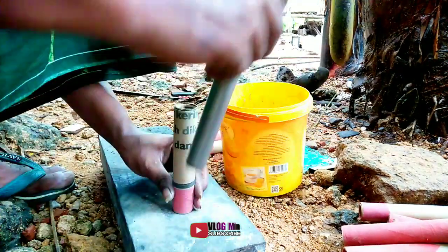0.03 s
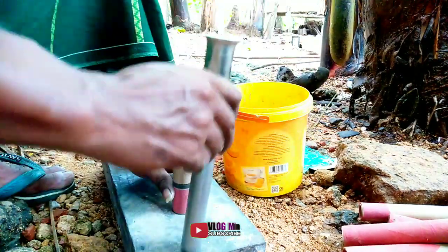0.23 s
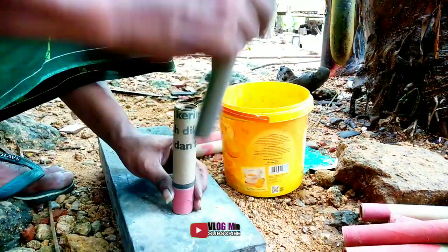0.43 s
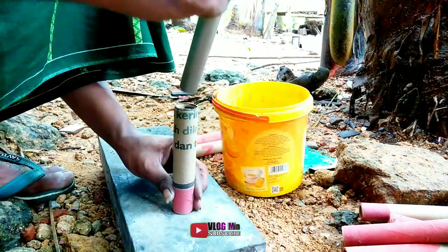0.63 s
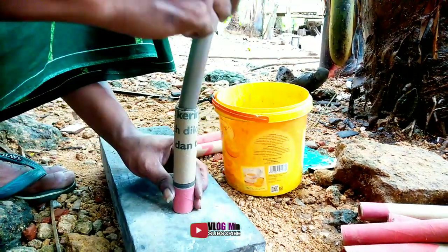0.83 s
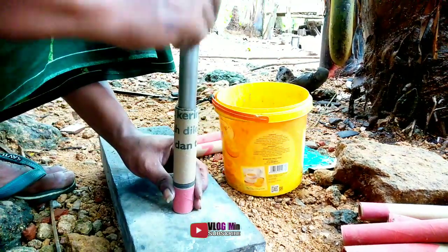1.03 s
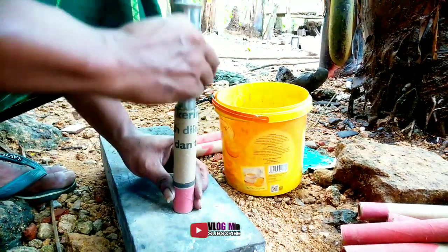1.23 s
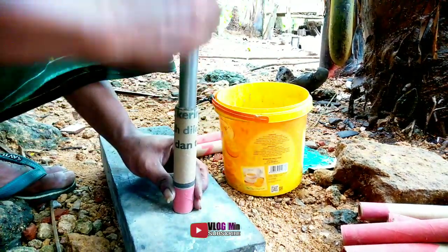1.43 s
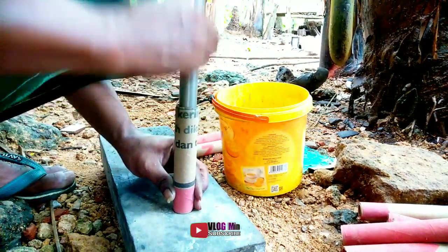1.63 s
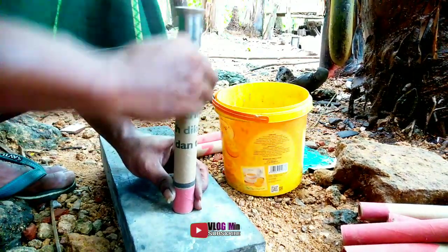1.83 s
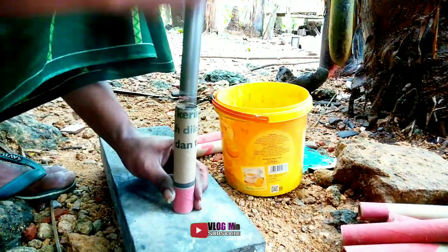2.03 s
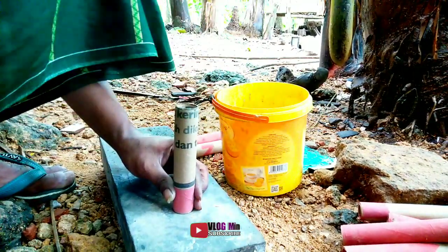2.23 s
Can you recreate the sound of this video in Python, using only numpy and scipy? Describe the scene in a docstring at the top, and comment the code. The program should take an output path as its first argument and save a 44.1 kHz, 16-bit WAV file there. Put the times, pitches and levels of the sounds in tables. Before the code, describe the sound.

A steel rod clacks sharply on a stone slab at 0.2 seconds, ringing briefly. From about 0.9 seconds it slides up and down a paper tube with light scraping and small squeaks, ramming the filling in gritty thuds at 1.2, 1.5 and 1.8 seconds, each harder. It slides out around 2 seconds. The sound is close, with a short dull echo, faint outdoor air and low handling rumble.

```python
"""One sharp clack of a steel rod on a stone slab, then three rubbing, squeaking strokes that end in thuds.
The rod slides into a paper tube standing on the slab and rams the filling down, scraping along the wall.
Each ram crunches the filling and thuds through slab and ground, harder as it packs.
The yard adds a short dull echo and a faint outdoor wash; a small close microphone with a gain control
picks it all up, along with a low handling rumble."""
import sys
import numpy as np
from scipy import signal
from scipy.fft import rfft, irfft, next_fast_len
from scipy.io import wavfile

SR = 44100
rng = np.random.default_rng(int(sys.argv[2]) if len(sys.argv) > 2 else 0)


def dump(signal):
    """Clip the signal to [-1, 1] and save it as 16-bit WAV at the path in sys.argv[1]."""
    limited = np.clip(np.atleast_2d(signal).T, -1, 1)
    pcm = np.round(limited * 32767).astype(np.int16)
    wavfile.write(sys.argv[1], SR, pcm)


N = 105840
TIME = np.arange(N) / SR

# The three rams. Each row: start in seconds, thud level in dB, contact corner in Hz,
# ground bounce in dB, the crunch's lead in seconds, crunch level in dB.
RAM_HITS = [(1.1704, -20.5, 654, -26.5, 0.0072, -36.5), (1.526, -7, 716, -21, 0.0026, -31),
            (1.8386, 0, 2100, -29, 0.00152, -22)]
# The slab's modes. Each row: pitch in Hz, level in dB struck bare, level in dB struck through the tube.
SLAB_MODES = [(184, -39, -12), (312, -24, -20), (480, -25, -20), (631, -17.5, -19.5), (820, -18, -16),
              (965, -38.5, -18), (1124, -16, -37.5), (1401, -9, -28.5), (1583.5, -10.5, -24),
              (2068, -28.5, -41), (2853, -38, -26.5), (3505, -44.5, -34.5)]
# The rammed tube's hollow ring. Each row: pitch in Hz, level in dB, T60 in seconds.
TUBE_MODES = [(474, -26, 0.058), (958, -37, 0.098)]
# The rod's free ring. Each row: pitch in Hz, level in dB, T60 in seconds.
ROD_MODES = [(1809, -33, .19), (4934, -46, .2), (14900, -65, .1)]
# The tone of crushed grit. Each row: frequency in Hz, relative level in dB.
GRIT_EQ = [(200, -35.5), (700, 5), (1550, 2), (2200, -5.5), (3300, -5), (5000, -14.5), (7000, -20.5),
           (10000, -25), (15500, -42)]
# The soil's shudder. Each row: frequency in Hz, relative level in dB.
SOIL_EQ = [(30, -4.5), (65, 11.5), (105, -10), (165, 2.5), (260, -15), (450, -16.5), (900, -25),
           (1300, -21.5), (2000, -43)]
# Strokes down the tube. Each row: start and bottom in seconds, hiss and rasp levels in dB.
DOWN_STROKES = [(0.924, 1.177, -51.5, -60), (1.45, 1.517, -39.5, -61.5), (1.75, 1.831, -39.5, -51.5)]
# Strokes up the tube. Each row: start, fastest moment and end in seconds, hiss and rasp levels in dB.
UP_STROKES = [(1.233, 1.345, 1.545, -53.5, -57), (1.569, 1.651, 1.788, -49.5, -56),
              (1.917, 1.982, 2.007, -46.5, -53), (1.98, 2.026, 2.106, -53, -62)]
# The bright hiss of the rub. Each row: frequency in Hz, relative level in dB.
HISS_EQ = [(1500, -6), (3000, -7), (4300, -1.5), (6500, 4.5), (9000, -1), (12000, -1), (15500, 4)]
# The tube's midrange rasp. Each row: frequency in Hz, relative level in dB.
RASP_EQ = [(300, -21), (800, -27), (1200, -20), (1600, 7.5), (2000, 1), (2350, -5.5), (3000, -2),
           (4200, -10), (8000, -22.5)]
# Squeaks on the wall. Each row: start and end in seconds, first, middle and last pitch in Hz,
# level in dB, second and third partials in dB against the first.
SQUEAK_GLIDES = [(1.056, 1.096, 1400, 1800, 2350, -59, -1, -10),
                 (1.1, 1.172, 2850, 3850, 4250, -56, -4, -15), (1.465, 1.5, 2500, 3550, 4800, -55, -8, -14),
                 (1.495, 1.527, 5000, 6000, 6900, -50, -7, -20),
                 (1.648, 1.725, 2450, 3130, 2600, -53, -11, -16),
                 (1.785, 1.815, 2800, 4400, 5900, -52, -6, -9),
                 (1.811, 1.838, 5850, 6700, 7400, -43, -6, -20),
                 (2.01, 2.062, 4380, 4640, 4650, -51, -9, -2)]
# Light touches of the rod. Each row: start in seconds, level in dB, brightness tilt in dB per octave.
ROD_TOUCHES = [(0.015, -54, -1.5), (0.812, -55.5, 25), (1.461, -49.5, 5), (1.617, -47.5, 4.5),
               (1.771, -51.5, 2.5), (1.8821, -45.5, 3), (1.9472, -41, 7.5)]
# A touch's tone before its tilt. Each row: frequency in Hz, relative level in dB.
TOUCH_EQ = [(500, 12), (1700, 13.5), (3500, 12), (7000, 6), (10000, -29), (15500, -6.5)]
# The puff at the tube's mouth. Each row: frequency in Hz, relative level in dB.
PUFF_EQ = [(100, -9), (170, 2), (260, -10), (380, -1.5), (520, -12), (1500, -29)]
# The colour of the yard's echo. Each row: frequency in Hz, gain in dB.
ECHO_EQ = [(60, -14), (300, -9.5), (600, 3), (1000, 7), (1600, 0), (2100, -5), (4000, 1.5), (15000, -18)]
# The swell of the handling rumble. Each row: time in seconds, level in dB.
RUMBLE_FADER = [(0, -54.5), (.12, -56.5), (.3, -65.5), (.82, -65), (.9, -55), (1.15, -50), (1.38, -49.5),
                (1.7, -56), (1.92, -49.5), (2.05, -65), (2.4, -65)]
# The rumble's tone. Each row: frequency in Hz, relative level in dB.
RUMBLE_EQ = [(20, -11.5), (40, -1), (70, 6.5), (95, -6.5), (130, -19.5), (200, -25.5), (500, -47)]
# The outdoor bed. Each row: frequency in Hz, relative level in dB.
AIR_EQ = [(25, 3), (70, -8), (120, -4.5), (300, -19.5), (700, -18), (800, -12.5), (920, -19.5),
          (1500, -20.5), (2500, -27.5), (5000, -33.5), (7000, -33.5), (10000, -37.5), (15500, -39)]
# The microphone's resonances. Each row: centre in Hz, width in Hz, boost in dB.
MIC_PEAKS = [(6670, 800, 9), (15350, 1678, 13)]

GROUND_HZ, GROUND_T60_S = 69, 0.078  # the slab rocking on the soil


def rams():
    """The filling crunches, then the blow rings tube and slab; the slab rocks and the soil shudders."""
    out, grit, soil = 0, noise(GRIT_EQ), noise(SOIL_EQ)
    for start, thud_db, contact_hz, ground_db, lead_s, crunch_db in RAM_HITS:
        stone = soften(slab(start, [through_tube for _, _, through_tube in SLAB_MODES]), contact_hz)
        shudder = from_db(-26.5) * decay(start, fall_s=0.036) * soil
        tube = sum(ring(start, *mode) for mode in TUBE_MODES)
        bounce = ring(start - lead_s / 2, GROUND_HZ, ground_db, GROUND_T60_S)
        crunch = from_db(crunch_db) * decay(start - lead_s, fall_s=0.003) * grit
        out += from_db(thud_db) * (stone + shudder + tube) + bounce + crunch
    low_cut = signal.butter(4, 38, "high", fs=SR, output="sos")
    return signal.sosfilt(low_cut, out)


def knock(start=0.215, contact_hz=3000, crack_lag_s=0.0006):
    """Steel on bare stone: a short clack and gritty crack, the rod's longer ring, a low bounce."""
    clack = from_db(1) * soften(slab(start, [bare for _, bare, _ in SLAB_MODES]), contact_hz)
    rod = sum(ring(start, *mode) for mode in ROD_MODES)
    crack = from_db(-19) * decay(start + crack_lag_s, fall_s=0.0013) * noise(GRIT_EQ)
    bounce = ring(start, GROUND_HZ, db=-29.5, t60=GROUND_T60_S)
    return clack + rod + soften(crack, contact_hz) + bounce


def slab(start, levels_db):
    """The stone's short, dry modes, neighbours swinging against each other."""
    return sum((-1) ** k * ring(start, hz, db, t60=0.031)
               for k, ((hz, _, _), db) in enumerate(zip(SLAB_MODES, levels_db)))


def rubbing(stop_s=0.022, grain_db=0, waver_db=2):
    """Friction follows the rod's speed: pushes speed up until they hit, pulls swell and fade."""
    strokes = []
    for start, bottom, *levels_db in DOWN_STROKES:
        speed = np.interp(TIME, [start, bottom, bottom + stop_s], [0, 1, 0])
        strokes.append((speed, *levels_db))
    for start, fastest, end, *levels_db in UP_STROKES:
        speed = np.sin(np.pi / 2 * np.interp(TIME, [start, fastest, end], [0, 1, 0]))
        strokes.append((speed, *levels_db))
    # Hiss climbs more steeply than rasp, so the rub brightens with speed.
    hiss = sum(from_db(db) * speed ** 1.95 for speed, db, _ in strokes)
    rasp = sum(from_db(db) * speed ** 0.94 for speed, _, db in strokes)
    # With the fast grain at zero depth, only the slower waver moves the level.
    flutter = rms_one(from_db(grain_db * drift(rate_hz=496) + waver_db * drift(rate_hz=45)))
    return flutter * (hiss * noise(HISS_EQ) + rasp * noise(RASP_EQ))


def squeaks(rough_db=3.5):
    """The rod squeaks on the wall: brief, broken glides of up to three partials."""
    out = np.zeros(N)
    jitter = 1 + 0.012 * drift(rate_hz=700)
    roughness = rms_one(from_db(rough_db * drift(rate_hz=190)))
    for start, end, first_hz, middle_hz, last_hz, db, *overtones_db in SQUEAK_GLIDES:
        on = (TIME > start) & (TIME < end)
        progress = (TIME[on] - start) / (end - start)
        glide = np.polyfit([0, .5, 1], [first_hz, middle_hz, last_hz], 2)
        hz = np.polyval(glide, progress) * jitter[on]
        phase = 2 * np.pi * np.cumsum(hz) / SR
        tone = sum(from_db(level) * np.sin(k * phase) * (k * hz < SR / 2)
                   for k, level in enumerate([0] + overtones_db, 1))
        out[on] += from_db(db) * np.sin(np.pi * progress) * roughness[on] * tone
    return out


def ticks():
    """Light touches of the rod, each a tiny noise burst with its own brightness."""
    out = np.zeros(N)
    for start, db, tilt in ROD_TOUCHES:
        tilted_eq = [(hz, level + tilt * np.log2(hz)) for hz, level in TOUCH_EQ]
        out += from_db(db) * decay(start, fall_s=0.0053) * noise(tilted_eq)
    return out


def exit_puff(peak_s=2.035, width_s=0.028):
    """A soft hollow puff of air drawn into the tube as the rod leaves it."""
    swell = np.exp(-((TIME - peak_s) / width_s) ** 2)
    return from_db(-59) * swell * noise(PUFF_EQ)


def yard_echo(x, predelay_s=0.0058, early_t60_s=0.082, late_t60_s=0.425):
    """Scattered reflections: a quick early part and a faint longer tail."""
    early = decay(predelay_s, early_t60_s / np.log(1000))
    late = from_db(-16.5) * decay(predelay_s, late_t60_s / np.log(1000))
    reflections = rms_one((early + late) * rng.standard_normal(N)) / np.sqrt(N)
    return from_db(-10.5) * colour(signal.fftconvolve(x, reflections)[:N], ECHO_EQ)


def handling_rumble():
    """Low handling noise that swells and sinks under the work."""
    return from_db(np.interp(TIME, *np.transpose(RUMBLE_FADER))) * noise(RUMBLE_EQ)


def outdoor_air():
    """A faint, steady outdoor bed."""
    return from_db(-60) * noise(AIR_EQ)


def ring(start, hz, db, t60):
    """One struck mode, dying by 60 dB in t60 seconds."""
    age = np.maximum(TIME - start, 0)
    return from_db(db - 60 * age / t60) * np.sin(2 * np.pi * hz * age)


def decay(start, fall_s):
    """Instant attack, exponential fall with time constant fall_s."""
    return (TIME >= start) * np.exp(-np.maximum(TIME - start, 0) / fall_s)


def soften(x, corner_hz):
    """A one-pole low-pass: rounds off edges, as a yielding contact does."""
    pole = np.exp(-2 * np.pi * corner_hz / SR)
    return signal.lfilter([1 - pole], [1, -pole], x)


def drift(rate_hz):
    """Smooth random motion of spread 1."""
    low_pass = signal.butter(2, rate_hz, fs=SR, output="sos")
    return rms_one(signal.sosfilt(low_pass, rng.standard_normal(N + SR))[SR:])


def noise(eq):
    """Coloured noise of unit power."""
    return rms_one(colour(rng.standard_normal(N), eq))


def colour(x, eq):
    """An equaliser drawn through (Hz, dB) points."""
    size = next_fast_len(2 * N, True)
    hz, db = np.transpose(eq)
    bin_hz = np.arange(size // 2 + 1) * SR / size
    gain = from_db(np.interp(np.log(bin_hz + 1), np.log(hz), db))
    # Minimum phase, so nothing rings ahead of an attack.
    cepstrum = irfft(np.log(gain), size)
    cepstrum[1:size // 2] *= 2
    cepstrum[size // 2 + 1:] = 0
    return irfft(rfft(x, size) * np.exp(rfft(cepstrum)), size)[:N]


def rms_one(x):
    """Scale to unit power."""
    return x / np.sqrt(np.mean(x ** 2) + 1e-20)


def from_db(db):
    """Decibels to gain."""
    return 10 ** (np.asarray(db) / 20)


def scene():
    """The rod's work up front, its echo and the background behind, in mono."""
    work = knock() + rams() + ticks() + rubbing() + squeaks() + exit_puff()
    return (work + yard_echo(work) + handling_rumble() + outdoor_air())[None]


def record(dry):
    """Bright microphone resonances, a gain control that ducks after peaks, and a steep top cut."""
    threshold_db, duck_share, release_db_per_s, top_hz = -12, 0.75, 14, 15500
    x = dry[0]
    for hz, width_hz, boost_db in MIC_PEAKS:
        resonance = signal.lfilter(*signal.iirpeak(hz, hz / width_hz, fs=SR), x)
        x = x + (from_db(boost_db) - 1) * resonance
    over_db = np.maximum(20 * np.log10(np.abs(x) + 1e-9) - threshold_db, 0)
    release_db = release_db_per_s * TIME
    duck_db = np.maximum.accumulate(duck_share * over_db + release_db) - release_db
    x = x * from_db(-soften(duck_db, corner_hz=25))
    top_cut = signal.ellip(12, .2, 70, top_hz, fs=SR, output="sos")
    return signal.sosfilt(top_cut, x)[None]


dry = scene()
out = record(dry)
dump(out)
```